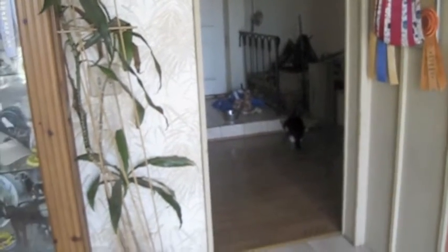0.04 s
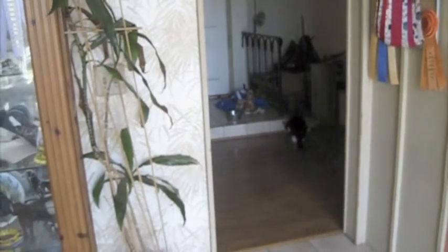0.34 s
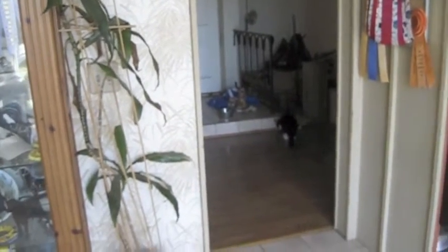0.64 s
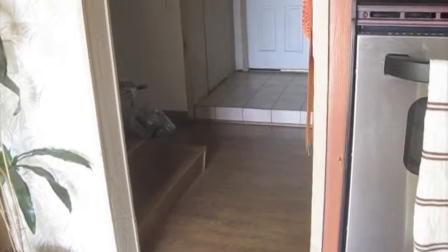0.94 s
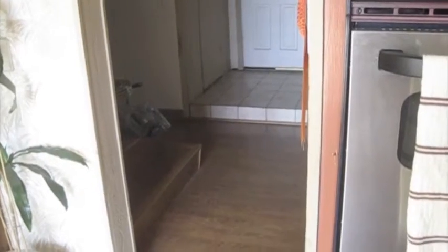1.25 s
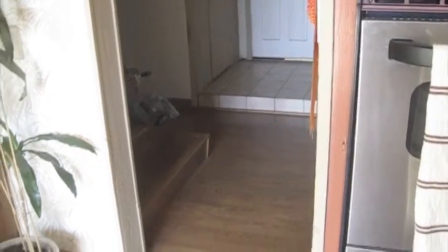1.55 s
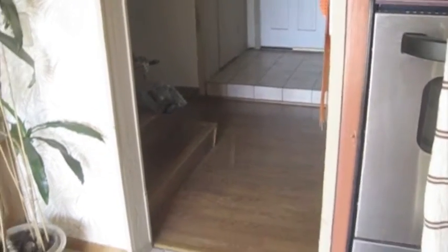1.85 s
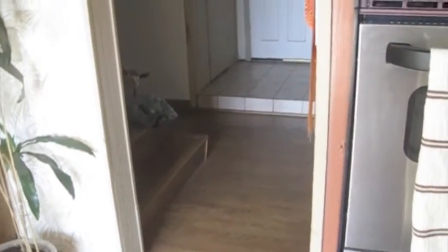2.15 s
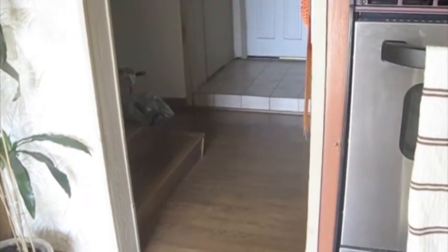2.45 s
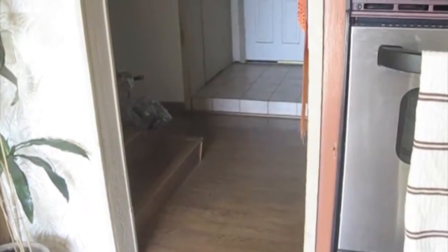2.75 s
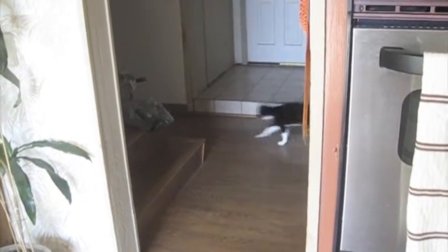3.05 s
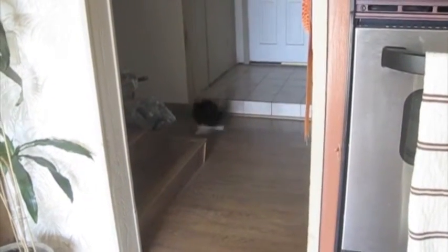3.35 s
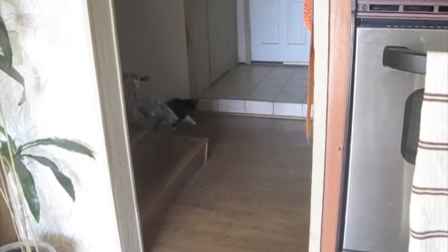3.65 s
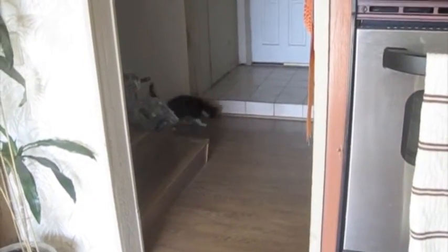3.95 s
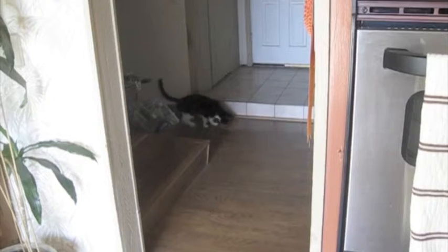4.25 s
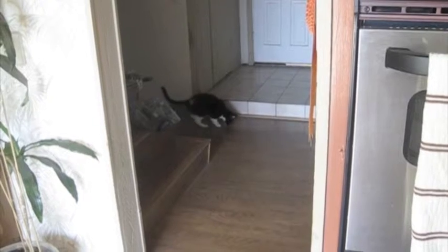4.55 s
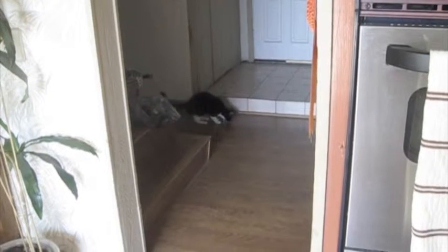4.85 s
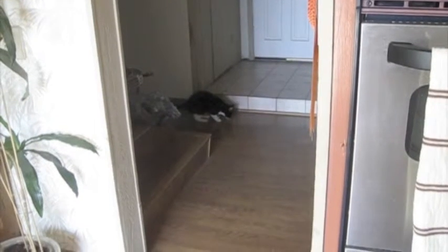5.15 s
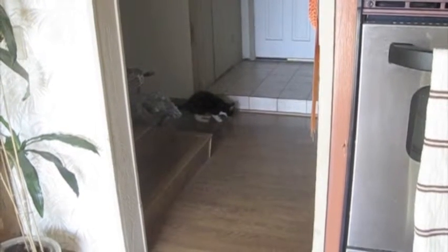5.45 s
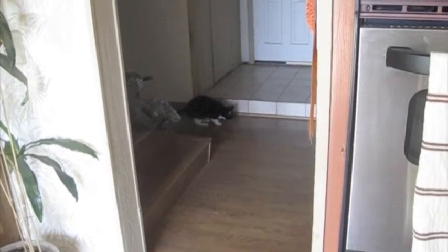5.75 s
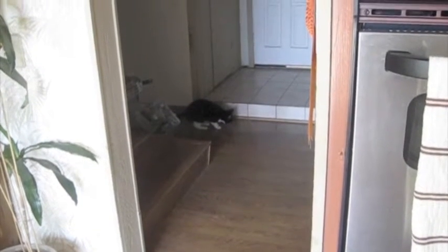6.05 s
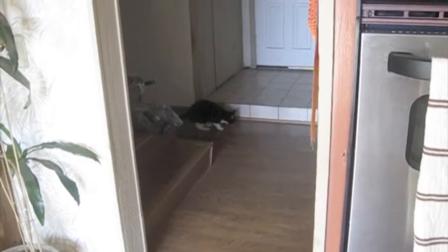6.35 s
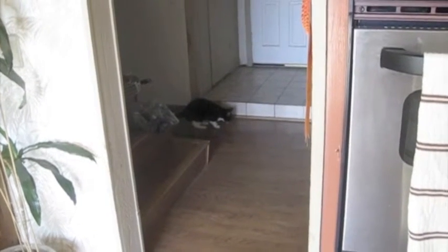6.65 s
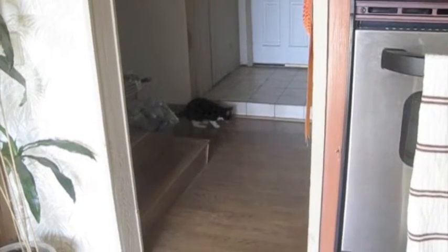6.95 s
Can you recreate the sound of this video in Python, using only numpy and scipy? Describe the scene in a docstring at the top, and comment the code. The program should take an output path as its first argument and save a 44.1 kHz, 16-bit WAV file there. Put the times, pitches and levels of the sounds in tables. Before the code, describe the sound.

Thrown kibble clatters to rest on laminate, followed by soft kitten paws and faint crunches over low house rumble and hiss.

```python
"""A bare, ringing hallway: house rumble, hiss, a weak appliance hum, distant traffic and faint ticks.
Early on the sound drops out briefly. At 2 s a piece of kibble hits the laminate and bounces to rest,
each contact a dry crack and a short ring of the boards. A kitten dashes after it and lands with soft
knocks on the hollow floor. A far car swells past near 4 s, and faint bites follow from 5.5 s among
small ticks, scratches and rustles."""
import sys
import numpy as np
from scipy import signal
from scipy.fft import rfft, irfft, next_fast_len
from scipy.io import wavfile
from scipy.ndimage import map_coordinates

SR = 44100
rng = np.random.default_rng(int(sys.argv[2]) if len(sys.argv) > 2 else 0)


def materialize(psi):
    """Save the field psi as 16-bit PCM at rate SR to the path in sys.argv[1].

    A 1-D psi becomes a single channel; in a 2-D psi each row is a channel.
    """
    bounded = np.clip(np.atleast_2d(psi).T, -1, 1)
    quanta = np.round(bounded * 32767).astype(np.int16)
    wavfile.write(sys.argv[1], SR, quanta)


N = 317961

# kibble hitting the floor: start_s, crack_db, treble_db_per_octave, direct_tilt_db_per_octave,
# wave_db, wave_pitch_hz, wave_lead_s, wave_fade_s, bright_echo_db
BOUNCES = [ (2.0399, -1, 2, 5.5, 2, 6100, 0.00025, 0.00023, -19),
           (2.3820, -19.5, -5.5, -2, -24, 3900, .0005, .0006, -42),
           (2.4639, -9.5, -4, -11, -5, 4370, 0.0013, 0.000046, -21),
           (2.6286, -12.5, 2.5, -12, -17.5, 4270, 0.0024, 0.0002, -20),
           (2.7719, -11.5, -3.5, -5, -16.5, 4300, 0.0024, .0014, -18),
           (2.982, -23, 0, -3, -32, 4100, .001, .0004, -46),
           (2.9848, -14, 0, -9, -13, 6240, .0003, 0.0003, -36),
           (2.985, -27, -9, -4, -11, 2500, 0.00063, 0.0014, -46),
           (3.1065, -20, 3.5, -4, -22, 3920, .0015, .0003, -17),
           (3.1704, -32, 0, -4, -26, 4150, .001, .0004, -31),
           (3.1797, -29, 0, -7, -26, 4000, .001, .0003, -29),
           (3.249, -27, -14, -8, -31, 4350, 0.0011, 0.0016, -45), ]
# tone of the dry crack on laminate: frequency_hz, relative_db
CRACK_EQ = [(100, -26), (330, -5.5), (900, -12), (1800, -10.5), (2800, -7), (3900, 0), (5000, -3.5),
            (6200, -4), (8000, -9.5), (12000, -12.5), (16000, -24)]
# low modes of the hollow floor: pitch_hz, relative_to_crack_db, fade_s
FLOOR_MODES = [(301, -41, 0.011), (410, -37.5, 0.0092), (830, -30.5, 0.0022)]
# first echoes off the walls: delay_s, level_db
WALL_ECHOES = [(.0037, -5.5), (.005, -5), (.012, -12), (.019, -11)]
# reverb time of the hallway: frequency_hz, t60_s
HALL_DECAY = [(200, 0.11), (1000, 0.74), (4000, 1), (7000, 0.77), (11000, 0.48), (16000, 0.23)]
# the kitten's soft landings: start_s, level_db, pitch_hz
LANDINGS = [(3.28, -44.5, 364), (3.487, -37, 318), (3.52, -45, 266)]
# fur and pads brushing laminate: frequency_hz, relative_db
BRUSH_EQ = [(700, -16), (1600, -5.5), (4500, -1), (7000, -12.5), (15000, -23)]
# the kitten's bites: start_s, crunch_db, ring_pitch_hz, ring_db
BITES = [(5.472, -47, 3810, -44), (6.188, -58, 3970, -46.5), (6.866, -46, 3480, -45.5)]
# tone of the crunch: frequency_hz, relative_db
CRUNCH_EQ = [(1200, -29), (2900, -3), (3800, -3), (5100, -5), (8000, -17), (14000, -32)]
# short dry scratches: start_s, level_db
SCRATCHES = [(.31, -53), (.378, -50), (.445, -53), (1.878, -49), (3.375, -54), (3.475, -57), (4.395, -51),
             (5.222, -51), (6.165, -50)]
# tone of a scratch: frequency_hz, relative_db
SCRATCH_EQ = [(1500, -23), (3500, 0), (8000, -0.5), (12000, -7.5), (16000, -17)]
# level ride of the fine patter: time_s, level_db
PATTER_LEVEL = [(.4, -54.5), (.9, -58.5), (1.6, -56), (3.1, -56), (3.6, -52.5), (4.05, -57.5), (4.45, -55),
                (4.77, -55.5), (5.3, -55.5), (5.55, -54), (5.72, -55), (6.35, -57), (6.55, -52.5),
                (6.73, -62.5), (6.9, -53), (7.2, -58)]
# tone of the fine patter: frequency_hz, relative_db
PATTER_EQ = [(1000, -21), (2300, 1), (4500, -4), (7000, -6), (9000, -11), (13000, -17), (16000, -34)]
# small ticks and taps: start_s, level_db, pitch_hz, width_hz
TICKS = [(.159, -43.5, 1230, 260), (.504, -41.5, 1200, 260), (.62, -52, 10900, 1990),
         (0.944, -46.5, 3940, 650), (1.157, -54, 9200, 1800), (1.597, -43.5, 1420, 480),
         (2.851, -44.5, 1530, 300), (2.991, -42.5, 2400, 450), (3.308, -45.5, 4500, 800),
         (3.345, -53, 2325, 400), (3.378, -51, 13800, 3000), (3.405, -64, 4180, 500),
         (3.555, -50, 10500, 4000), (3.57, -46, 3950, 1400), (3.677, -52.5, 6950, 800),
         (3.7, -52, 5600, 900), (3.805, -57, 6240, 610), (4.1, -52, 3700, 900), (4.188, -49, 5000, 280),
         (4.258, -57, 10000, 900), (4.295, -51.5, 3280, 450), (4.41, -51, 5420, 1200),
         (4.485, -47, 2800, 350), (4.595, -54, 6400, 600), (4.655, -52.5, 6200, 900),
         (4.845, -53.5, 8800, 2400), (4.895, -49.5, 7640, 1200), (4.925, -50, 5500, 1400),
         (5.036, -45, 1350, 400), (5.055, -46, 2050, 250), (5.123, -51.5, 8600, 3000),
         (5.253, -48.5, 12700, 3200), (5.428, -56, 12300, 1600), (5.55, -57, 11200, 2400),
         (5.63, -56, 9450, 700), (5.79, -52, 4870, 500), (5.945, -52, 2520, 350), (6.008, -47, 6700, 900),
         (6.305, -58, 9600, 700), (6.325, -50, 2580, 400), (6.498, -53, 6300, 900),
         (6.679, -50.5, 12200, 2300), (6.795, -53, 10100, 1600), (6.866, -51.5, 5100, 700),
         (7.06, -54, 9100, 700)]
# soft rustles: peak_s, level_db, pitch_hz, width_hz, rise_s
RUSTLES = [(.17, -52, 3650, 805, 0.058), (.33, -50.5, 1200, 390, 0.053), (.45, -53, 2400, 550, 0.085),
           (.9, -54, 1390, 452, 0.16), (1.25, -51, 1440, 450, 0.057), (5.07, -52, 2900, 700, 0.078),
           (5.13, -52.5, 2580, 170, 0.068), (5.26, -55.5, 6200, 1900, 0.096),
           (5.36, -51.5, 2320, 600, 0.036), (5.38, -54, 4520, 1600, 0.14), (6.47, -51, 2880, 800, 0.045),
           (6.56, -48, 1690, 900, 0.052), (6.53, -53.5, 5700, 3000, 0.052)]
# tone of the house rumble: frequency_hz, relative_db
RUMBLE_EQ = [(15, -26), (25, 6.5), (33, -0.5), (50, -3.5), (70, -3.5), (88, -6.5), (115, -3.5), (128, -4.5),
             (146, -5), (175, -15.5), (250, -13), (400, -40.5)]
# tone of the distant traffic: frequency_hz, relative_db
TRAFFIC_EQ = [(88, -58), (150, -3), (203, -2.5), (247, 3), (334, -2), (426, -2), (625, -2), (855, 0),
              (994, -0.5), (1100, -3.5), (1250, -2), (1750, -13), (2400, -19), (3120, -71), (5280, -120)]
# tone of the soft hiss: frequency_hz, relative_db
HISS_EQ = [(940, -10), (1600, 6.5), (1740, 3.5), (2140, 1), (2380, -3.5), (2590, 1.5), (6660, -8),
           (8310, -12), (12700, -14), (15100, -27), (16000, -28)]
# low drones that swell once: peak_s, level_db, pitch_hz, rise_s, fall_s
SURGES = [(2.05, -55.5, 147.2, 0.43, 0.6), (5.9, -50.5, 69.8, 0.6, 0.21)]
# partials of the appliance hum: pitch_hz, level_db, phase_waver_rad
HUM_PARTIALS = [(424.4, -64.5, 0.89), (987, -64.5, 1.46), (1017, -66, 1.45), (2067, -68.5, 1.8)]
# the brief dropout and the fade back in: time_s, gain
DROPOUT = [(.652, 1), (.655, .04), (.675, .004), (.69, 0), (.762, 0), (.78, .2), (.8, .4), (.85, .65),
           (.9, 1)]

RING_HZ, RING_RISE_S, RING_FADE_S, RING_DB = 4390, 0.00005, 0.0016, -14  # boards; dB against the crack
CRACK_REVERB_DB, FLOOR_REVERB_DB = 2.5, -20  # sends to the hallway
RUN_S, RUN_DB, RUN_RISE_S, RUN_FALL_S = 3.2, -53, 0.26, 1  # the kitten's dash
CAR_S, CAR_DB, CAR_RISE_S, CAR_FALL_S = 3.95, -45, 0.9, 1
RUMBLE_DB, TRAFFIC_DB, HISS_DB, DRONE_DB = -49.5, -49, -51.5, -61.5  # base levels of the background


def kibble(ring_scatter=0.044, tilt_gain_share=.25, echo_delay_s=0.0031, echo_hz=7600):
    """Each contact sends a bending wave through the boards, just ahead of the airborne crack."""
    out = np.zeros(N)
    preroll = SR // 100
    t = np.arange(-preroll, SR // 20) / SR
    for start, crack_db, treble, tilt, wave_db, wave_hz, lead, fade, echo_db in BOUNCES:
        early = start - preroll / SR
        wave = amp(wave_db) * packet(t, wave_hz, lead, fade, glide_per_s=190)
        ring_hz = RING_HZ * (1 + ring_scatter * rng.uniform(-1, 1))  # each spot has its own pitch
        ring = amp(crack_db + RING_DB) * packet(t, ring_hz, RING_RISE_S, RING_FADE_S)
        floor = filtered(wave + ring, board_radiation)
        add(out, early, floor)
        # a hard corner gives a brighter crack than a flat side
        crack = amp(crack_db) * click(lambda f: along(CRACK_EQ, f) + treble * octaves_above(f, 4500))
        # grazing the floor tilts the direct path's treble, mostly down; the walls get the full crack
        graze = click(lambda f: tilt * octaves_above(f, 6000))
        add(out, start, signal.fftconvolve(crack, graze) * amp(tilt_gain_share * tilt))
        for mode_hz, db, mode_fade in FLOOR_MODES:
            add(out, early, amp(crack_db + db) * packet(t, mode_hz, RING_RISE_S, mode_fade))
        # the nearby door frame throws back only the treble
        add(out, early + echo_delay_s, amp(echo_db) * packet(t, echo_hz, lead_s=0.0004, fade_s=0.000088))
        add(out, start, amp(CRACK_REVERB_DB) * signal.fftconvolve(crack, hallway()))
        add(out, early, amp(FLOOR_REVERB_DB) * signal.fftconvolve(floor, hallway()))
    return out


def board_radiation(hz, low_hz=2900, high_hz=7600):
    """The boards radiate only waves faster than sound, and damp the very shortest."""
    return (1 - 1 / (1 + (hz / low_hz) ** 6)) / (1 + (hz / high_hz) ** 10)


def hallway(build_s=0.007, early_boost=0.61, early_fade_s=0.0044, smear_s=0.00074):
    """The room's answer: short wall echoes, then a diffuse tail that rings longest near 4 kHz."""
    hz, times, bands = signal.stft(rng.standard_normal(SR), SR, nperseg=256)
    decay = amp(-60 * times / along(HALL_DECAY, hz)[:, None])
    tail = signal.istft(bands * decay, SR, nperseg=256)[1]
    t = np.arange(len(tail)) / SR
    tail = tail * (1 - np.exp(-t / build_s)) * (1 + early_boost * np.exp(-t / early_fade_s))
    tail /= np.linalg.norm(tail)
    for delay, db in WALL_ECHOES:
        echo = rng.standard_normal(len(t)) * np.exp(-t / smear_s)  # spread by mouldings and edges
        add(tail, delay, amp(db) * echo / np.linalg.norm(echo))
    return tail


def kitten(knock_db=2):
    """Paws scuff drily over the boards; each landing knocks the hollow floor, and the room answers."""
    scuffing = grainy(BRUSH_EQ, grain_db=9.0, size=N)
    out = amp(RUN_DB + 2.4 * wobble(26)) * swell(RUN_S, RUN_RISE_S, RUN_FALL_S) * scuffing
    t = np.arange(SR // 4) / SR
    for start, db, hz in LANDINGS:
        knock = np.sin(2 * np.pi * hz * t) * envelope(t, rise_s=.002, fade_s=0.011)
        add(out, start, amp(db + knock_db) * knock)
        add(out, start, amp(db) * puff(hz, width_share=0.42, rise_s=0.0026, fade_s=0.06))
    return out


def bites(rise_s=0.00092, tap_db=1):
    """Each bite is a burst of tiny fractures and a pitched tap that lingers briefly in the room."""
    out = np.zeros(N)
    t = np.arange(SR // 2) / SR
    for start, crunch_db, hz, ring_db in BITES:
        crunch = grainy(CRUNCH_EQ, grain_db=6, size=len(t)) * envelope(t, rise_s, fade_s=0.055)
        tap = np.sin(2 * np.pi * hz * t) * envelope(t, rise_s, fade_s=0.0051)
        ring = puff(hz, width_share=.08, rise_s=0.002, fade_s=0.044)
        add(out, start, amp(crunch_db) * crunch + amp(ring_db + tap_db) * tap + amp(ring_db) * ring)
    return out


def scratches():
    """Short dry scrapes, bright and without pitch."""
    out = np.zeros(N)
    stroke = envelope(np.arange(SR // 2) / SR, rise_s=0.0024, fade_s=0.065)
    for start, db in SCRATCHES:
        add(out, start, amp(db) * grainy(SCRATCH_EQ, grain_db=5.5, size=len(stroke)) * stroke)
    return out


def patter(ticks_per_s=600, fade_s=0.024):
    """Tiny ticks merge into a fine rustle; each wakes one band, which dies away in the room."""
    hz, times, bands = signal.stft(rng.standard_normal(N), SR, nperseg=512)
    struck = rng.random(bands.shape) < ticks_per_s * times[1] / len(hz)
    linger = np.outer(np.hanning(16), np.exp(-2 * times[:40] / fade_s))
    power = np.abs(signal.fftconvolve(struck.astype(float), linger))[:len(hz), :len(times)]
    texture = signal.istft(bands * np.sqrt(power), nperseg=512)[1][:N]
    return amp(curve(PATTER_LEVEL)) * coloured(texture, PATTER_EQ)


def ticks(t60_share=0.054, snap_db=2):
    """Faint, narrow-band ticks: a dry snap, then a short fading tail."""
    out = np.zeros(N)
    for start, db, hz, width_hz in TICKS:
        snap = puff(hz, 1.9 * width_hz / hz, rise_s=0.0003, fade_s=0.0035)
        tail = puff(hz, width_hz / hz, rise_s=0.0027, fade_s=t60_share * along(HALL_DECAY, hz))
        add(out, start, amp(db + snap_db) * snap + amp(db) * tail)
    return out


def rustles(fall_over_rise=1.85):
    """Soft brushing sounds that swell and linger; the narrowest is a thin squeak."""
    return sum(amp(db) * swell(peak, rise, fall_over_rise * rise) * band(hz, width_hz / hz, size=N)
               for peak, db, hz, width_hz, rise in RUSTLES)


def house_rumble(ride_db):
    """The deep, nearly steady noise of the house."""
    return amp(RUMBLE_DB + 0.5 * ride_db + 0.36 * wobble(10)) * rush(RUMBLE_EQ, patchy_db=0.5)


def traffic(ride_db):
    """A distant wash of road noise that swells as one car passes."""
    car = amp(CAR_DB) * swell(CAR_S, CAR_RISE_S, CAR_FALL_S)
    return np.hypot(amp(TRAFFIC_DB + ride_db), car) * rush(TRAFFIC_EQ, patchy_db=1.22)


def hiss(dip_db):
    """A soft, nearly even hiss."""
    return amp(HISS_DB + dip_db + .5 * wobble(14)) * rush(HISS_EQ, patchy_db=1.5)


def drones(pitch_hz=70.9):
    """One low tone wavers throughout; two more each swell once."""
    drone = amp(DRONE_DB + 4.5 * wobble(3.77)) * tone(pitch_hz, waver_rad=0.21)
    return drone + sum(amp(db) * swell(peak, rise, fall) * tone(hz, waver_rad=0.38)
                       for peak, db, hz, rise, fall in SURGES)


def appliance_hum(dip_db):
    """Weak partials, each drifting in level and phase."""
    return sum(amp(db + 1.4 * dip_db + 1.8 * wobble(3.36)) * tone(hz, waver)
               for hz, db, waver in HUM_PARTIALS)


def background(resume_s=.77, opening_db=1.5, sag_db=-6, recover_s=0.84):
    """The room tone; all but the drones come back softer after the dropout, then creep up."""
    t = np.arange(N) / SR
    ride_db = np.where(t < resume_s, opening_db, sag_db * np.exp((resume_s - t) / recover_s))
    dip_db = np.minimum(ride_db, 0)
    return house_rumble(ride_db) + traffic(ride_db) + hiss(dip_db) + drones() + appliance_hum(dip_db)


def packet(t, hz, lead_s, fade_s, glide_per_s=0):
    """A ping that grows up to t = 0 and then fades; with glide the higher pitches arrive first."""
    pitch = hz * np.clip(1 - glide_per_s * t, .96, 1.6)
    phase = 2 * np.pi * np.cumsum(pitch) / SR
    attack = np.clip(1 + t / lead_s, 0, 1) ** 1.76
    return -np.sin(phase - np.interp(0, t, phase)) * attack * np.exp(-np.maximum(t, 0) / fade_s)


def click(spectrum_db, size=1024):
    """The tightest (minimum-phase) pulse shaped by spectrum_db(hz), with energy 1."""
    cepstrum = irfft(np.log(amp(spectrum_db(np.fft.rfftfreq(size, 1 / SR)))))
    cepstrum[1:size // 2] *= 2
    cepstrum[size // 2 + 1:] = 0
    pulse = irfft(np.exp(rfft(cepstrum)))
    return pulse / np.linalg.norm(pulse)


def puff(hz, width_share, rise_s, fade_s):
    """A band of noise that swells and dies away."""
    t = np.arange(SR // 2) / SR
    return band(hz, width_share, size=len(t)) * envelope(t, rise_s, fade_s)


def band(hz, width_share, size):
    """Noise of rms 1 around a pitch, with steep skirts."""
    skirts = lambda f: 1 / (1 + ((f - hz) / (width_share * hz)) ** 2) ** 2
    return unit(filtered(rng.standard_normal(size), skirts))


def grainy(eq, grain_db, size):
    """Coloured noise of rms 1, broken into grains a few milliseconds long."""
    grains = rng.standard_normal(size) * amp(grain_db * np.tanh(wobble(300)[:size]))
    return coloured(grains, eq)


def rush(eq, patchy_db):
    """Coloured noise of rms 1 with small patches of random gain."""
    bands = signal.stft(rng.standard_normal(N), nperseg=1024)[2]
    patch = np.outer(np.hanning(13), np.hanning(9))
    patches = signal.fftconvolve(rng.standard_normal(bands.shape), patch, "same")
    noise = signal.istft(bands * amp(patchy_db * unit(patches)), nperseg=1024)[1][:N]
    return coloured(noise, eq)


def tone(hz, waver_rad):
    """A sine of rms 1 with a wavering phase."""
    t = np.arange(N) / SR
    return np.sqrt(2) * np.sin(2 * np.pi * hz * t + waver_rad * wobble(25))


def envelope(t, rise_s, fade_s):
    """A quick attack and an exponential decay."""
    return (1 - np.exp(-t / rise_s)) * np.exp(-t / fade_s)


def swell(peak_s, rise_s, fall_s):
    """A smooth bell of height 1."""
    t = np.arange(N) / SR - peak_s
    return np.exp(-(t / np.where(t < 0, rise_s, fall_s)) ** 2)


def wobble(knots_per_s):
    """A smooth random curve."""
    knots = rng.standard_normal(int(N * knots_per_s / SR) + 4)
    return map_coordinates(knots, [np.arange(N) * knots_per_s / SR])


def curve(rows):
    """One value per sample from (time_s, value) rows."""
    times, values = np.transpose(rows)
    return np.interp(np.arange(N) / SR, times, values)


def along(rows, hz):
    """Read (frequency_hz, value) rows on a log axis."""
    frequencies, values = np.transpose(rows)
    return np.interp(np.log(hz + 1), np.log(frequencies + 1), values)


def octaves_above(hz, corner_hz):
    """Octaves over a corner frequency, zero below it."""
    return np.log2(np.maximum(hz / corner_hz, 1))


def coloured(x, eq):
    """Apply an EQ table and scale to rms 1."""
    return unit(filtered(x, lambda hz: amp(along(eq, hz))))


def filtered(x, response):
    """Filter with a gain of response(hz)."""
    size = next_fast_len(len(x) + SR // 4)
    return irfft(rfft(x, size) * response(np.fft.rfftfreq(size, 1 / SR)), size)[:len(x)]


def add(track, start_s, sound):
    """Mix a sound into the track."""
    part = track[round(start_s * SR):][:len(sound)]
    part += sound[:len(part)]


def amp(db):
    """Decibels to gain."""
    return 10 ** (np.asarray(db) / 20)


def unit(x):
    """Scale to rms 1."""
    return x / np.sqrt(np.mean(x ** 2) + 1e-20)


def scene():
    """Everything in the hallway, heard in mono from the kitchen door."""
    mix = kibble() + kitten() + bites() + scratches() + patter() + ticks() + rustles() + background()
    return mix[None]


def record(dry, ceiling=.85, top_hz=15850):
    """The sound drops out once and fades back in; peaks are rounded off and the very top is cut."""
    gated = dry[0] * curve(DROPOUT)
    rounded = gated / (1 + (gated / ceiling) ** 6) ** (1 / 6)
    return filtered(rounded, lambda hz: hz < top_hz)[None]


dry = scene()
out = record(dry)
materialize(out)
```